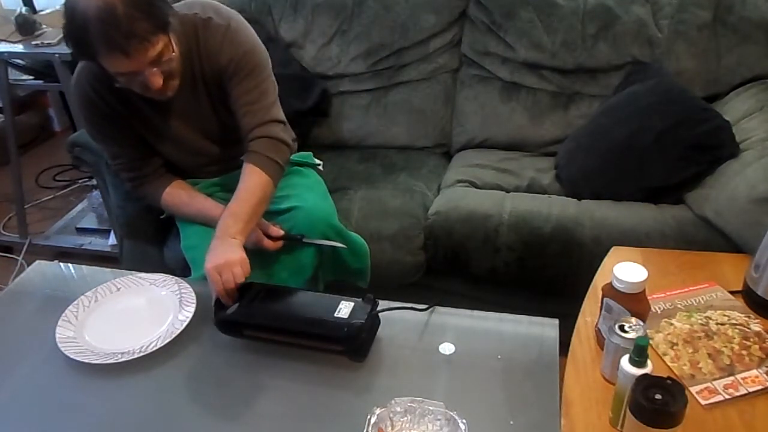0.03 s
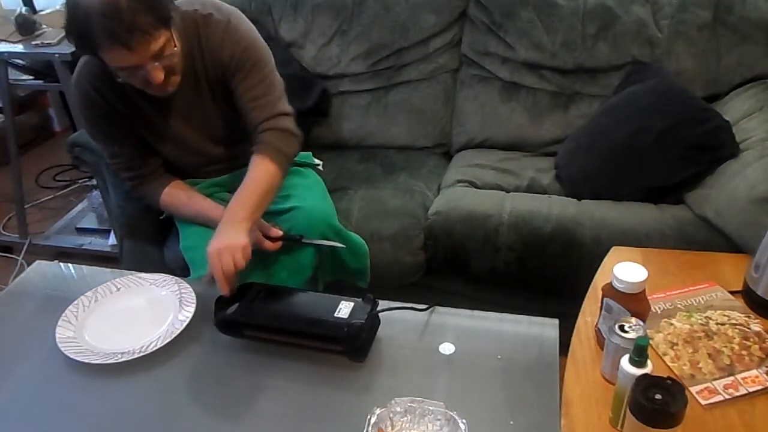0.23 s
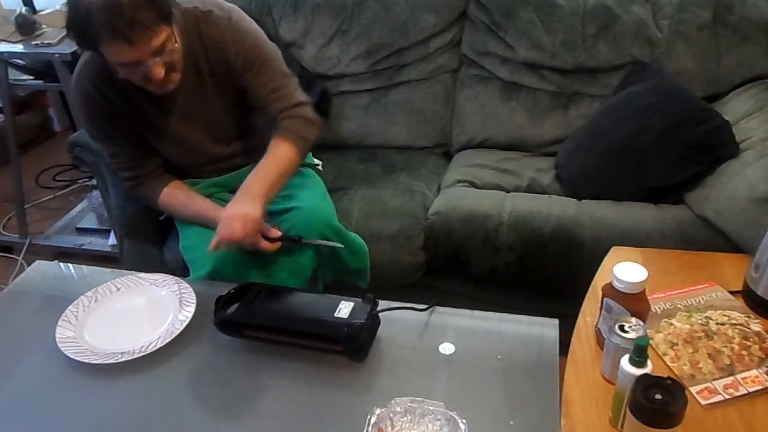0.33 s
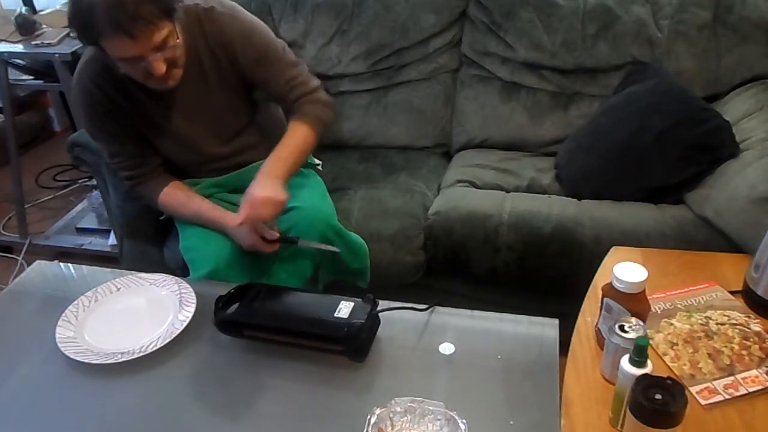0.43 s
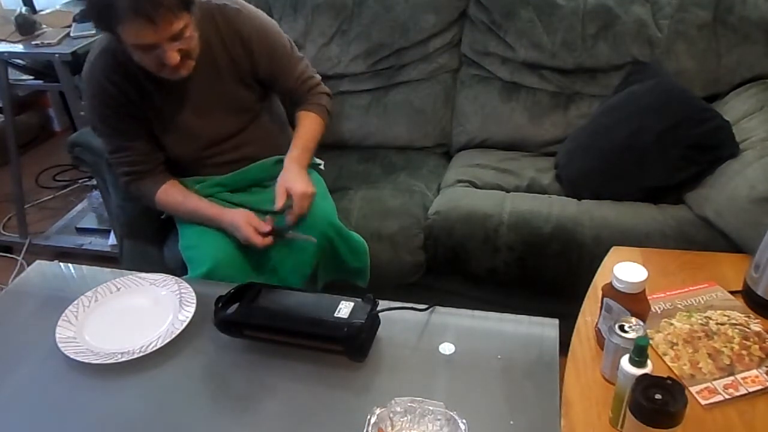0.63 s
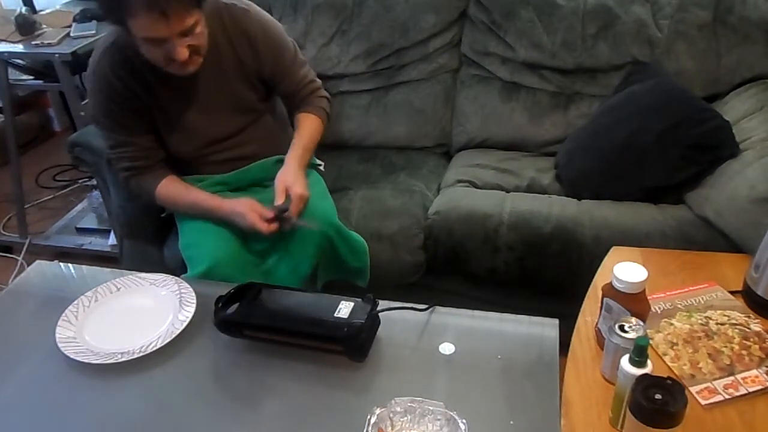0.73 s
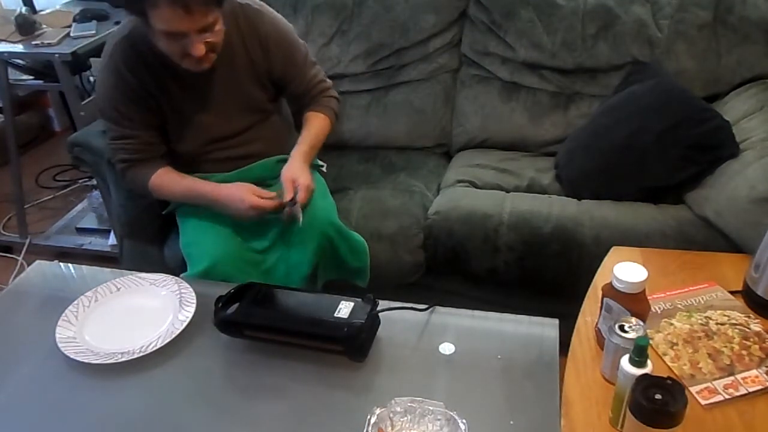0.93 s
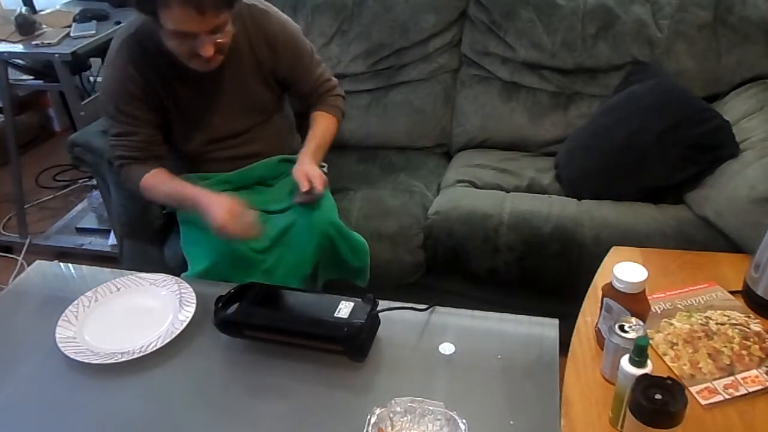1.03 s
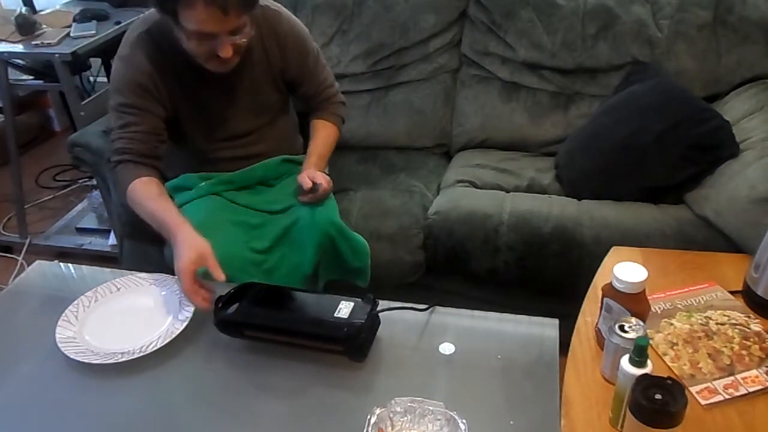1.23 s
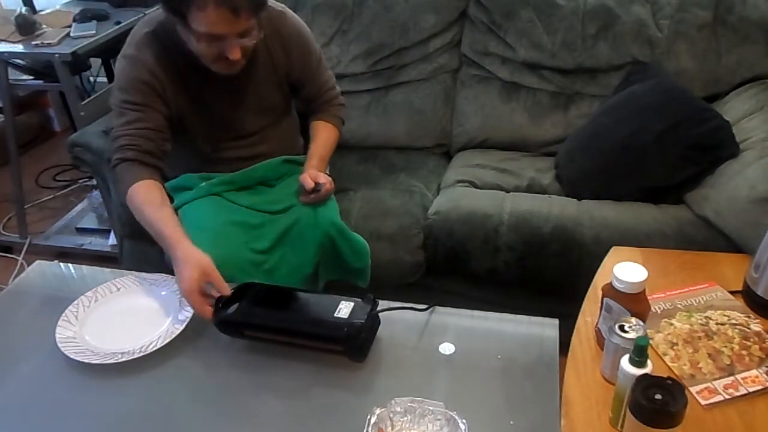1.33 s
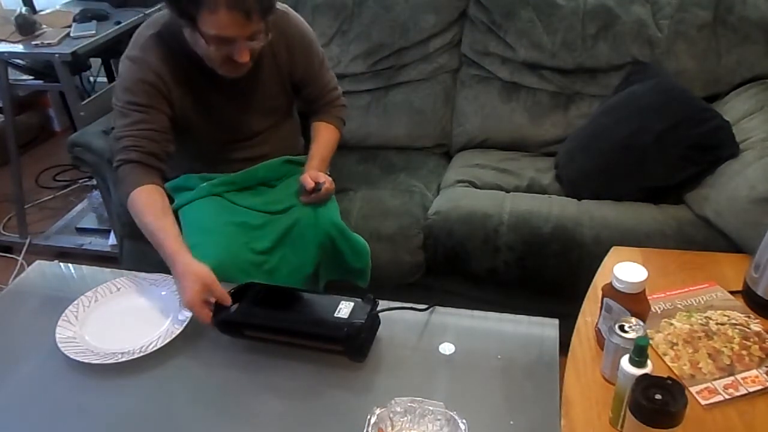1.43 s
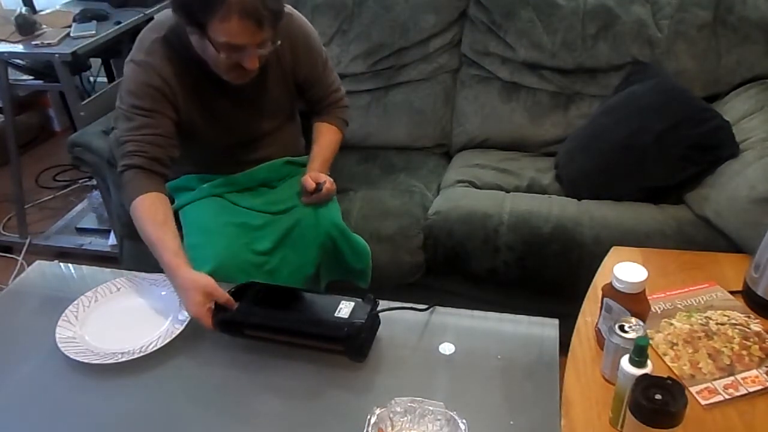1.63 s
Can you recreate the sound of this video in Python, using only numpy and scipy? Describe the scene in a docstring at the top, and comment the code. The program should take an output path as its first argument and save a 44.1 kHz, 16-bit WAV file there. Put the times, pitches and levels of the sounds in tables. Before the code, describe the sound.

A small countertop cooker lid snaps shut with one sharp crack and a plastic thud, after a faint rustle and tick. The metal plates ring briefly, then a hand lightly knocks the cooker. Quiet living room hiss lies underneath.

```python
"""Living room: the lid of a small countertop cooker is pressed down, touches, then latches shut.
The latch cracks, the plastic shell thuds, the metal plates ring on faintly, the room answers.
A fading rustle and a tick come first; later a hand knocks lightly on the cooker.
Underneath: room hiss and soft, low thumps in the microphone."""
import sys
import numpy as np
from scipy import signal
from scipy.io import wavfile

SR = 44100
rng = np.random.default_rng(int(sys.argv[2]) if len(sys.argv) > 2 else 0)


def transcribe(signal):
    """Save signal, clipped to [-1, 1], as a 16-bit WAV file at the path in sys.argv[1]."""
    frames = np.atleast_2d(signal).T
    limited = np.clip(frames, -1, 1)
    pcm = np.round(limited * 32767).astype(np.int16)
    wavfile.write(sys.argv[1], SR, pcm)


N = 74970
TIME_S = np.arange(N) / SR

# latch slipping, then landing: after_snap_s, level_db
LATCH_CONTACTS = [(0.0, -7), (.00022, -4), (.00043, 2.5), (.00084, -8)]
# latch: pitch_hz, level_db, t60_s
LATCH_MODES = [(2960, -25.5, 0.013), (4750, -11.5, .003), (5130, -30, 0.039), (7100, -2.5, 0.0019),
               (9500, -13, 0.0034), (12530, -21, .0015)]
# plastic shell: pitch_hz, level_db, t60_s
SHELL_MODES = [(206, -30.5, 0.1185), (310, -37, 0.065), (381.5, -22, 0.16), (494, -24, 0.074),
               (550, -16.5, 0.037), (741, -30.5, .06)]
# metal plates and table: pitch_hz, level_db, t60_s
PLATE_MODES = [(103.65, -43.5, 0.5), (120.8, -47, 1), (204.4, -44.5, 1), (266.7, -50.5, 1),
               (361.7, -42.5, 0.88), (463, -48.5, 0.76), (540, -41, .45), (600, -52, 0.66),
               (755, -45, 0.57), (846, -42.5, 0.3), (1054.7, -46, .45), (1144, -42, 0.68),
               (1354.6, -42, 0.61), (1826, -44.5, 0.27), (1900, -41.5, .35), (3333, -42.5, .3),
               (4280, -42.5, 0.22), (5260, -39, 0.1), (5100, -44.5, .28), (9760, -42, 0.18)]
# reflections off the table and near surfaces: delay_s, level_db
ECHOES = [(.0023, -24), (.0053, -17), (.0086, -17.5), (0.0175, -21.5)]
# reverberation: freq_hz, relative_density_db, t60_s
REVERB_BANDS = [(40, -27, 0.72), (92.3, -1.5, .9), (174, -1.5, 0.51), (404, 5.5, 0.36), (700, 2.5, 0.33),
                (970, 0.5, 0.38), (1498, 0, .42), (2100, -1.5, 0.43), (3024, 1, 0.29), (3600, -7, 0.34),
                (5160, 2.5, 0.27), (6170, -3, 0.23), (8000, -2.5, 0.26), (10000, -0.5, 0.21),
                (12500, -10, 0.15), (16130, -19, 0.16)]
# lid meeting the rim: start_s, level_db
TOUCHES = [(.181, -24.5), (.2272, -17)]
# hand on the cooker: start_s, level_db
KNOCKS = [(1.3025, -54), (1.3105, -54.5), (1.3345, -60), (1.345, -67)]
# knocked cooker: pitch_hz, level_db, t60_s
KNOCK_MODES = [(710, -4.5, 0.08), (837, -7.5, 0.088), (1324, -3.5, 0.038), (5840, -10.5, 0.019)]
# scuff of each knock: freq_hz, relative_density_db
SCUFF_SPECTRUM = [(400, -26), (750, 17.5), (1200, -12), (2400, -1), (3200, -22), (10000, -39)]
# handling rustle: freq_hz, relative_density_db
RUSTLE_SPECTRUM = [(50, -15.5), (110, 0.5), (200, -0.5), (600, -1.5), (900, -8), (2100, -11), (5900, -11.5),
                   (7000, -22.5), (9300, -9.5), (16000, -43)]
# rustle fade: time_s, level_db
RUSTLE_ENVELOPE = [(0.0, -49.5), (.07, -59), (.14, -64), (.22, -63.5), (.35, -89)]
# double pulses in the microphone: start_s, level_db
THUMPS = [(0.101, -41), (.114, -40.5), (0.205, -38), (0.217, -38), (0.405, -40.5), (0.417, -44),
          (.599, -40), (0.698, -42.5), (0.712, -42), (0.904, -44.5), (1.102, -42), (1.114, -46.5),
          (1.201, -43), (1.212, -41), (1.405, -43), (1.597, -40), (1.696, -41.5)]
# steady room noise: freq_hz, relative_density_db
FLOOR_SPECTRUM = [(25, 0.0), (50, -3.1), (85, -13.4), (140, -13.5), (200, -12.2), (300, -18.0),
                  (600, -22.5), (1000, -23.3), (1500, -21.5), (2200, -27.0), (3300, -30.7), (4300, -30.0),
                  (5200, -29.7), (7000, -33.0), (9500, -32.8), (12000, -35.2), (15500, -39.1)]

SNAP_S, SHELL_LAG_S = .2296, .0003


def lid_snap():
    """The latch cracks and echoes, the shell thuds just after, plates and room ring on."""
    crack = through(clicks(LATCH_CONTACTS, SNAP_S), ringing(LATCH_MODES))
    thud = through(clicks([(SHELL_LAG_S, 0)], SNAP_S), shell_response())
    plates = filtered(ringing(PLATE_MODES), "high", hz=92)
    tail = through(clicks([(SNAP_S, 0)]), plates + room_response())
    return crack + through(crack, echo_response()) + thud + tail


def shell_response(low_hz=179.6, top_hz=1300):
    """The small shell radiates its modes, but little deep bass or treble."""
    return filtered(filtered(ringing(SHELL_MODES), "high", low_hz), "low", top_hz)


def echo_response(smear_s=.0004):
    """Near reflections, each smeared by clutter."""
    bursts = rng.standard_normal((len(ECHOES), N)) * np.exp(-TIME_S / smear_s)
    return sum(through(clicks([echo]), burst / np.linalg.norm(burst))
               for echo, burst in zip(ECHOES, bursts))


def room_response(level_db=-20.5, build_s=.0054):
    """Diffuse reflections build quickly and die sooner in the treble."""
    centres_hz, bands = noise_bands(REVERB_BANDS)
    t60_s = at_hz(REVERB_BANDS, centres_hz, column=2)
    decay = from_db(level_db - 60 * TIME_S / t60_s[:, None])
    return (1 - np.exp(-TIME_S / build_s)) * np.sum(bands * decay, axis=0)


def lid_touches():
    """Soft contacts with the rim ring the shell without treble."""
    return filtered(through(clicks(TOUCHES), shell_response()), "low", hz=775)


def latch_tick(start_s=.073, level_db=-36):
    """A faint, dulled ring of the latch."""
    return filtered(through(clicks([(start_s, level_db)]), ringing(LATCH_MODES)), "low", hz=4500)


def hand_knocks(scuff_relative_db=-1.5, scuff_t60_s=.08):
    """Each light knock rings the cooker and scuffs it."""
    scuff = from_db(scuff_relative_db - 60 * TIME_S / scuff_t60_s) * noise(SCUFF_SPECTRUM)
    return through(clicks(KNOCKS), ringing(KNOCK_MODES) + scuff)


def handling_rustle():
    """Handling noise, dying away at the start."""
    level_db = np.interp(TIME_S, *np.transpose(RUSTLE_ENVELOPE))
    return from_db(level_db) * noise(RUSTLE_SPECTRUM)


def microphone_thumps(gap_s=.004, width_s=.0014, first_relative_db=-3.5, rolloff_hz=15):
    """Paired pressure dips swing back through the microphone's bass roll-off."""
    dips = np.zeros(N)
    for start_s, level_db in THUMPS:
        for lag_s, part_db in [(0, first_relative_db), (gap_s, 0)]:
            dips -= from_db(level_db + part_db) * np.exp(-.5 * ((TIME_S - start_s - lag_s) / width_s) ** 2)
    return filtered(dips, "high", rolloff_hz, order=1)


def room_noise(level_db=-63):
    """Steady rumble and hiss."""
    return from_db(level_db) * noise(FLOOR_SPECTRUM)


def from_db(db):
    """Decibels to gain."""
    return 10 ** (np.asarray(db) / 20)


def at_hz(table, hz, column=1):
    """Table column interpolated over log frequency."""
    table = np.array(table)
    return np.interp(np.log(hz), np.log(table[:, 0]), table[:, column])


def clicks(rows, offset_s=0):
    """One impulse per row."""
    impulses = np.zeros(N)
    for start_s, level_db in rows:
        impulses[round((offset_s + start_s) * SR)] += from_db(level_db)
    return impulses


def through(x, response):
    """Convolution with an impulse response."""
    return signal.fftconvolve(x, response)[:N]


def filtered(x, kind, hz, order=2):
    """Butterworth filter."""
    return signal.sosfilt(signal.butter(order, hz, kind, fs=SR, output="sos"), x)


def ringing(modes):
    """Struck body: a sum of decaying sines."""
    return sum(from_db(level_db - 60 * TIME_S / t60_s) * np.sin(2 * np.pi * pitch_hz * TIME_S)
               for pitch_hz, level_db, t60_s in modes)


def noise_bands(spectrum):
    """Centres and third-octave noise bands, unit total power."""
    edges_hz = np.geomspace(20, 18000, 30)
    centres_hz = np.sqrt(edges_hz[1:] * edges_hz[:-1])
    white = rng.standard_normal((2, N + SR))
    bands = np.array([from_db(at_hz(spectrum, hz)) * filtered(white[k % 2], "band", edges_hz[k:k + 2])[SR:]
                      for k, hz in enumerate(centres_hz)])
    return centres_hz, bands / np.sqrt(np.sum(np.mean(bands ** 2, axis=1)))


def noise(spectrum):
    """Shaped noise: the bands summed."""
    return noise_bands(spectrum)[1].sum(axis=0)


def scene():
    """All sources at one microphone."""
    cooker = lid_snap() + lid_touches() + latch_tick() + handling_rustle() + hand_knocks()
    return (cooker + microphone_thumps() + room_noise())[None]


def record(dry):
    """Overload flattens the crack's peak; a steep low-pass cuts the top."""
    ceiling, cutoff_hz = .62, 16000
    rounded = dry / (1 + (dry / ceiling) ** 4) ** .25
    return signal.sosfilt(signal.ellip(10, .2, 90, cutoff_hz, fs=SR, output="sos"), rounded)


dry = scene()
out = record(dry)
transcribe(out)
```